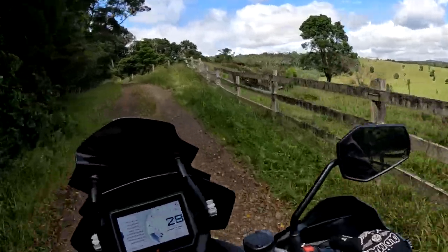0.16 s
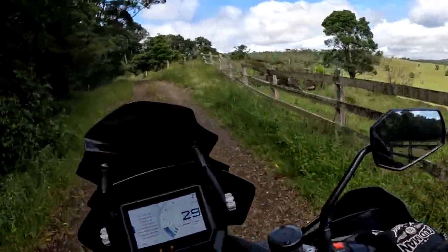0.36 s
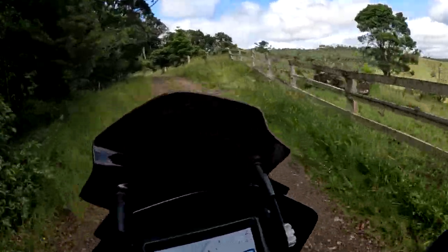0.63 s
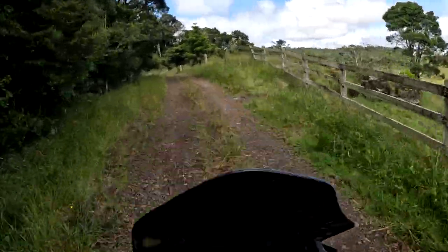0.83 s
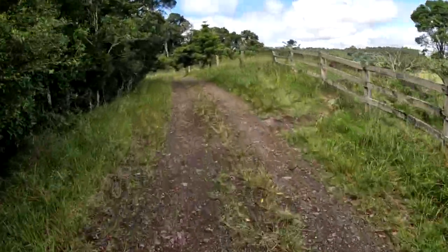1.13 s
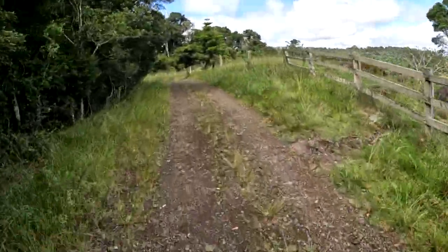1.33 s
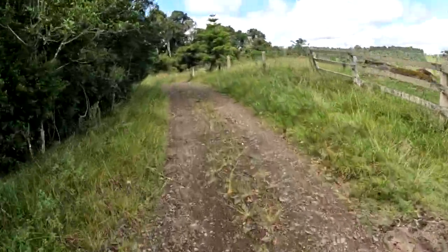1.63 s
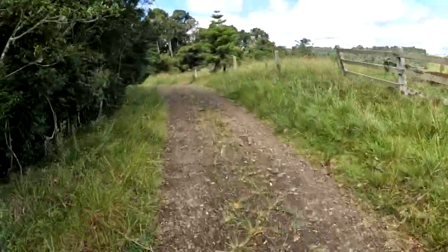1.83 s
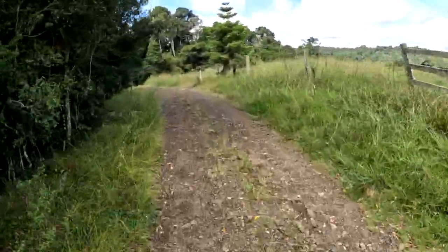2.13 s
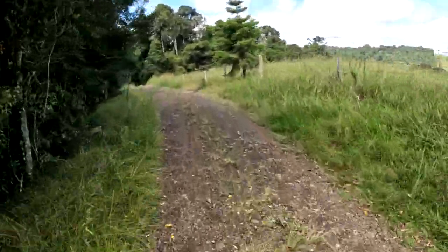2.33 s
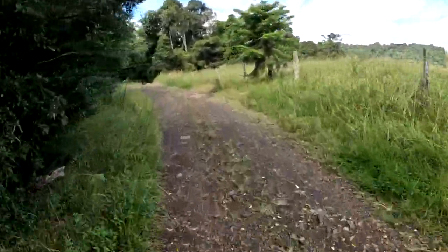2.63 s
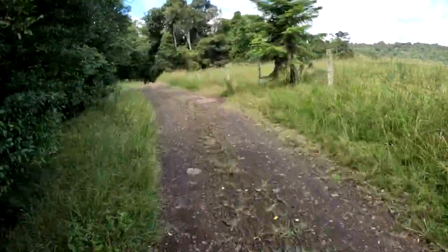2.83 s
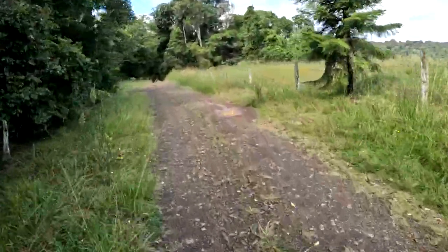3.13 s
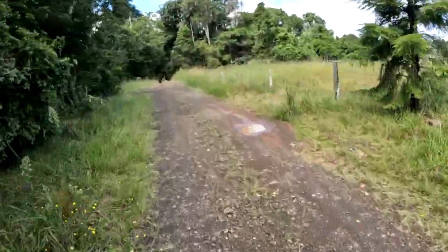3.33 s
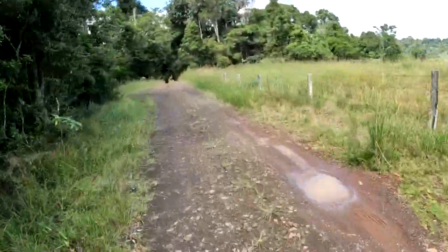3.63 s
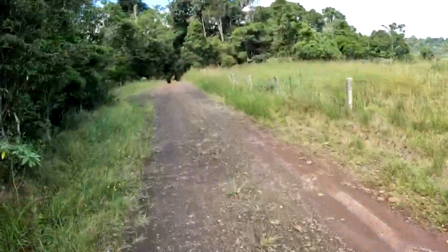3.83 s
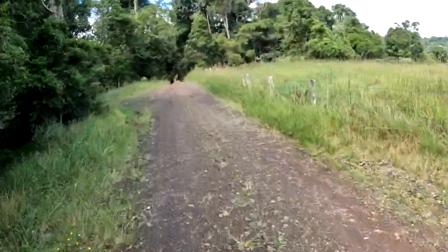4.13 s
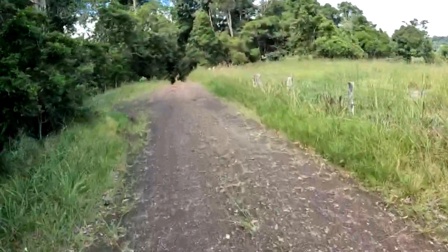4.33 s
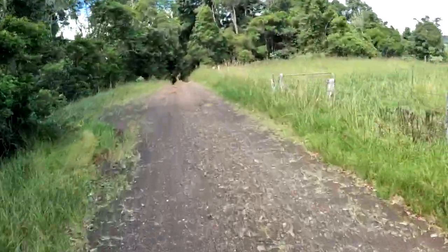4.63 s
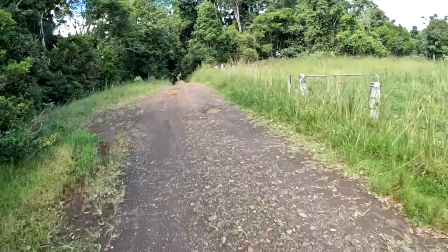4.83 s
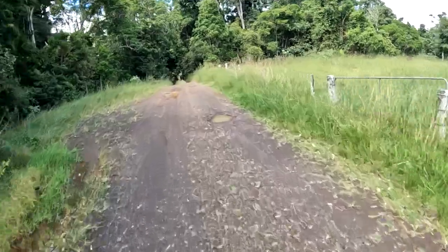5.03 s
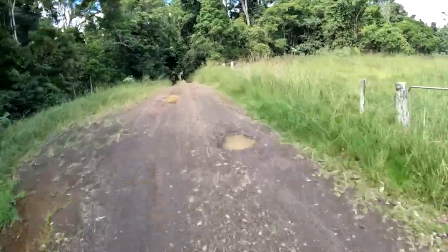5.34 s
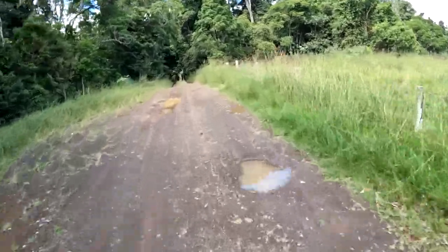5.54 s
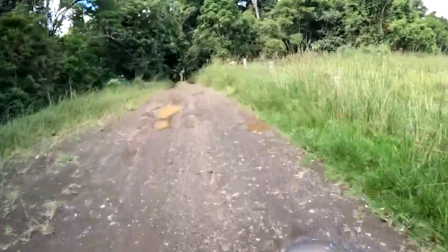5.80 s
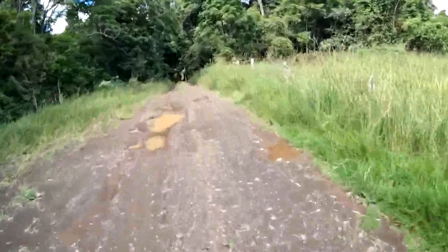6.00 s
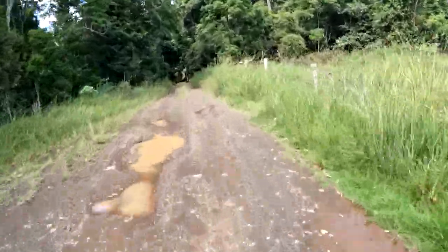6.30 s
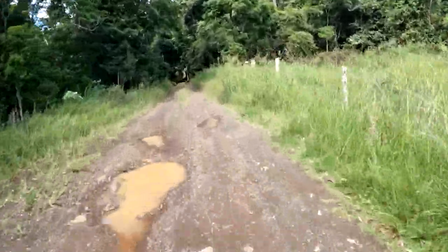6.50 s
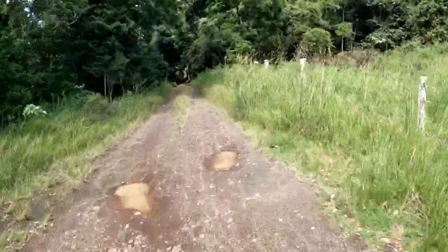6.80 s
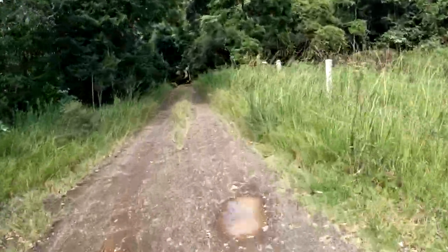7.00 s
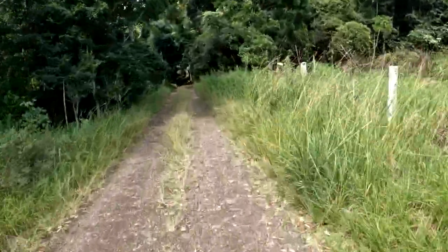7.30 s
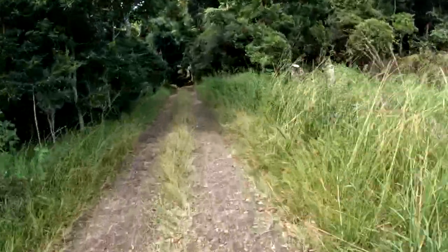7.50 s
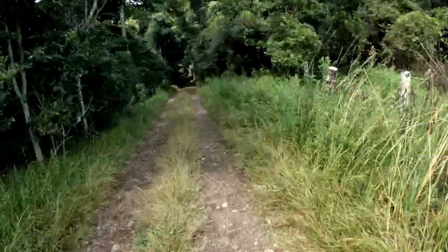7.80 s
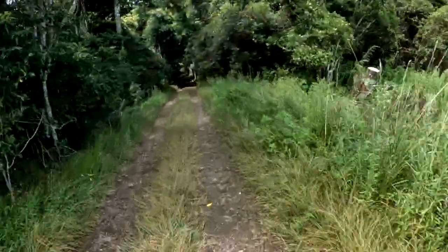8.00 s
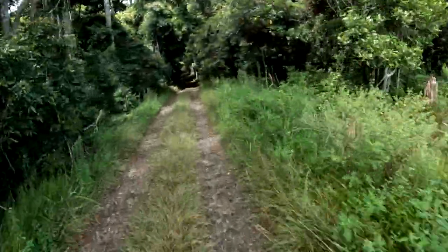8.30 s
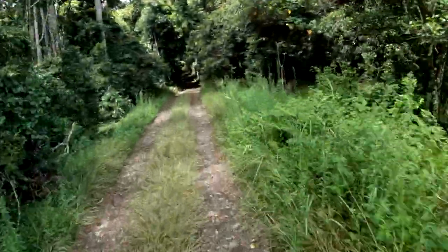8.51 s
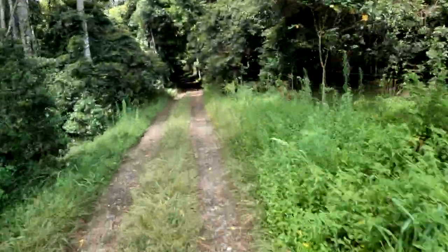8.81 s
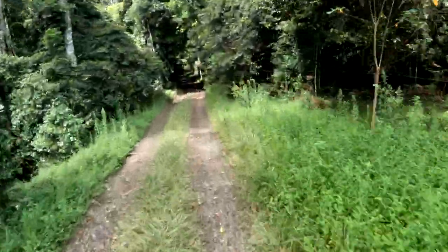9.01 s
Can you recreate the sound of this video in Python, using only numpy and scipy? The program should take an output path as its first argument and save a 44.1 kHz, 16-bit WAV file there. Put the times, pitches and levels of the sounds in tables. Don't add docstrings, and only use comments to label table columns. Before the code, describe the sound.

A low, lumpy motorcycle engine drives along an open rural gravel track. Wind thuds softly at the onboard microphone, dull and centred at first. Revs rise, the throttle closes and the note softens and falls, then drops sharply with a higher gear before a slow lugging pull. Gravel crunches throughout, with stones striking the belly plate, becoming clearer, wider and busiest in a stony rut near the end.

```python
import sys
import numpy as np
from scipy import signal
from scipy.io import wavfile
from scipy.ndimage import uniform_filter1d

SR = 44100
rng = np.random.default_rng(int(sys.argv[2]) if len(sys.argv) > 2 else 0)


def voltage_ratio(level):
    return 10 ** (np.asarray(level, float) / 20)


def dump(signal):
    limited = np.clip(np.atleast_2d(signal).T, -1, 1)
    pcm = np.round(limited * 32767).astype(np.int16)
    wavfile.write(sys.argv[1], SR, pcm)


N = 403515
T = np.arange(N) / SR
UPSHIFT_S = 6.22
LOW_GEAR, HIGH_GEAR = T < UPSHIFT_S, T >= UPSHIFT_S
V_GAP_CYCLES = 285 / 720
INTAKE_AT_CYCLES = .79


def curves(table):
    s, *columns = np.transpose(table)
    return [np.interp(T, s, c) for c in columns]


def unit(x):
    return x / np.sqrt(np.mean(x ** 2))


def band(x, hz, width_hz):
    return signal.lfilter(*signal.iirpeak(hz, hz / width_hz, SR), x)


def ring(pulses, modes):
    return sum(voltage_ratio(db) * band(band(pulses, hz, w), hz, 1.3 * w) for hz, w, db in modes)


def steep(x, hz, kind):
    return signal.sosfilt(signal.butter(6, hz, kind, fs=SR, output="sos"), x)


def below(x, hz, order=5):
    return signal.sosfiltfilt(signal.butter(order, hz, fs=SR, output="sos"), x)


def walk(rate_hz):
    k = int(SR / rate_hz)
    steps = np.repeat(rng.standard_normal(N // k + 1), k)
    return 1.8 * uniform_filter1d(uniform_filter1d(steps, k), k)[:N]


def ports(lean, side_db):
    mid, side = rng.standard_normal((2, N))
    return mid + (lean * mid + voltage_ratio(side_db) * side) * np.array([[1], [-1]])


# (time [s], stereo share [0-1])
OPENING = [(0, 0.05), (4.15, 0.06), (4.75, 0.36), (5.3, 0.68), (6.5, 0.77), (8, 0.83), (9.15, 1)]


def stereo_share():
    return curves(OPENING)[0]


# (time [s], level [dB])
GUSTS = [(0, -40), (0.25, -25), (0.55, -29.5), (0.8, -34), (1.4, -33), (2.7, -30.5), (3.9, -32), (4.5, -40),
         (5.3, -46), (6.57, -40.5), (7.4, -43), (8.2, -35), (9.15, -46)]


def wind():
    buffet = unit(band(band(ports(.02, -14.5), 23, 54), 27, 74))
    return voltage_ratio(curves(GUSTS)[0] + 9.5 + 1.5 * walk(6.4)) * buffet


# (time [s], level [dB])
PORT_HISS = [(0, -84.5), (1.65, -82.5), (1.7, -67), (2.55, -64), (3.4, -59), (3.9, -65), (6.5, -75.5),
             (7.7, -71.5), (9.15, -67.5)]


def port_hiss(heap_db):
    noise = ports(0.3, -4.5)
    broad = voltage_ratio(-16 + 12 * stereo_share()) * band(noise, 12800, 3600)
    hiss = band(band(noise, 12100, 900), 12100, 1500) + broad
    level_db = curves(PORT_HISS)[0] + 0.9 * heap_db + 1.8 * walk(60)
    return voltage_ratio(level_db) * unit(hiss - (T < 4.5) * below(hiss, 11300))


def bright_tick():
    t = np.maximum(T - 9.146, 0)
    return voltage_ratio(-35) * (t > 0) * np.exp(-t / .004) * steep(ports(.2, -2.5), 9500, "high")


# (time [s], peak [dB])
GRIT = [(0.3855, -58), (0.6255, -54), (0.7402, -50), (0.9552, -55.5), (1.2471, -55.5), (1.4632, -51.5),
        (3.2926, -54.5), (3.4575, -54.5), (3.6255, -59), (3.683, -50.5), (3.7374, -56), (3.9478, -52),
        (4.0951, -55), (4.2527, -58), (4.4408, -55), (4.4705, -50.5), (4.4965, -47), (5.2772, -51),
        (5.4804, -46.5), (5.5438, -44.5), (5.6221, -52), (5.6416, -48), (5.684, -48), (5.7259, -46.5),
        (5.8082, -41.5), (5.8671, -42), (5.9574, -49), (6.1614, -49.5), (6.4193, -49.5), (6.7116, -45.5),
        (6.759, -48.5), (6.987, -47), (7.0653, -47), (7.3502, -44.5), (7.559, -47), (7.7835, -37),
        (7.8201, -42.5), (7.8461, -40), (7.8986, -42), (7.9194, -38.5), (7.9628, -37.5), (8.2432, -43),
        (8.3308, -40.5), (8.4266, -40.5), (8.763, -44), (8.8474, -37.5), (8.9426, -42.5), (8.9825, -45.5),
        (9.0349, -40), (9.102, -38.5)]


def grit_ticks(t60_s=0.02):
    envelope, t = np.zeros(N + 2000), np.arange(2000) / SR
    for s, db in GRIT:
        envelope[int(s * SR):][:2000] += voltage_ratio(db - 6.5) * np.exp(-np.log(1000) * t / t60_s)
    return envelope[:N] * unit(band(band(ports(.2, -4.0), 8800, 3500), 8800, 5000))


# (time [s], gravel level [dB])
SURFACE = [(0, -46), (0.36, -43), (2.5, -42), (3.7, -41), (3.95, -44), (4.87, -48.5), (6.85, -47.5),
           (7.18, -41.5), (7.74, -42.5), (8.5, -42.5), (9.15, -42.5)]


def surface():
    return curves(SURFACE)[0]


# (time [s], rise [dB], length [s])
HEAPS = [(0.672, 0, 0.5), (0.986, 6.5, 0.066), (1.54, 6, 0.18), (1.692, 3, 0.06), (3.69, 2, 0.24),
         (5.507, 3, 0.072), (6.198, 6, 0.04), (6.453, 4.5, 0.063), (7.98, 3, 0.37), (8.952, 1.5, 0.059),
         (9.129, -0.5, 0.054)]


def heaps():
    return sum(db * np.maximum(1 - np.abs(T - s) * 2 / length_s, 0) for s, db, length_s in HEAPS)


def body(modes, lean, side_db, flicker_db):
    out = 0
    for hz, w, db in modes:
        noise = band(band(ports(lean, side_db), hz, w), hz, 1.56 * w)
        out = out + voltage_ratio(db + flicker_db * walk(25)) * noise / w ** .5
    return unit(out)


# (frequency [Hz], width [Hz], level [dB])
TYRE_MODES = [(1080, 470, 2), (1387, 200, -4), (1798, 590, 1.5)]


def tyre_roar(looser_db, heap_db):
    roar_db = -34.5 + 0.51 * looser_db + heap_db
    return voltage_ratio(roar_db) * below(body(TYRE_MODES, 0.18, -11.5, 1.0), 2010, order=8)


# (frequency [Hz], width [Hz], level [dB])
CASING_MODES = [(150, 200, 2), (376.4, 140, -1.5), (482.5, 150, -0.5), (607, 200, -21.5)]


def casing_noise(bark_db, looser_db, heap_db):
    casing_db = -25 + 0.13 * (bark_db - PULLING_BARK_DB) + 0.53 * looser_db + 0.74 * heap_db
    return voltage_ratio(casing_db - 2.5) * body(CASING_MODES, 0.18, -20.5, 1.4)


# (frequency [Hz], density [dB per Hz])
GRAVEL_SPECTRUM = [(1290, -30), (2200, 3.5), (2520, -7.5), (2940, -3.5), (3770, -10.5), (5070, -12.5),
                   (7490, -20.5), (11000, -35), (14300, -59), (22000, -120)]


def gravel():
    grains = (rng.random(N) < 900 / SR) * voltage_ratio(np.minimum(4.0 * rng.exponential(1, N), 14))
    gate = unit(signal.lfilter([1], [1, -.97], grains))
    surge, out = walk(24), 0
    hz_points, db_points = np.transpose(GRAVEL_SPECTRUM)
    for hz in 2300 * 2 ** np.arange(0, 2.4, 1 / 3):
        db = np.interp(np.log(hz), np.log(hz_points), db_points) + 10 * np.log10(hz)
        db = db + 0.19 * surge + 0.34 * walk(30)
        noise = ports(0.3, -11 + hz / 2500) * (1 + 0.25 * gate)
        out = out + voltage_ratio(db) * band(band(noise, hz, hz / 1.2), hz, hz / 3.7)
    return unit(out)


# (frequency [Hz], width [Hz], level [dB])
PLATE_MODES = [(946, 74, 3), (1130, 280, 2.5), (3100, 300, -19.5)]


def chips():
    hits = (rng.random(N) < 140 / SR) * rng.standard_normal(N)
    hits = hits * voltage_ratio(np.minimum(3.0 * rng.exponential(1, N), 12))
    return unit(ring(hits, PLATE_MODES)) * np.array([[1.2], [.8]])


# (time [s], peak [dB], ring [Hz])
PLATE_HITS = [(0.526, -28.5, 1270), (0.67, -32, 904), (0.749, -23.5, 1160), (0.866, -27, 970),
              (0.971, -31, 1050), (1.03, -33, 1030), (1.087, -28, 1360), (1.261, -22, 1016),
              (1.489, -28, 950), (1.851, -27, 1340), (1.936, -33, 1010), (2.535, -34, 1040),
              (2.882, -31, 1030), (3.457, -23, 845), (3.568, -28, 1340), (3.684, -22.5, 1310),
              (3.736, -25, 1080), (3.799, -22, 1207), (4.094, -28, 920), (4.1, -23, 1170),
              (4.528, -30, 950), (4.638, -26.5, 1190), (5.165, -28, 940), (5.276, -23.5, 940),
              (5.48, -27, 1390), (5.544, -22, 1080), (5.863, -23, 1140), (5.96, -25, 1060),
              (6.164, -28, 1450), (6.217, -21, 1130), (6.255, -35, 1090), (6.319, -29, 1200),
              (6.706, -29, 1130), (6.935, -24, 1110), (7.028, -31, 1410), (7.121, -20, 1150),
              (7.177, -30, 1040), (7.217, -34, 1020), (7.268, -21, 1080), (7.357, -27, 1150),
              (7.416, -25, 1056), (7.703, -21, 1080), (7.732, -30, 1470), (7.751, -35, 1150),
              (7.899, -24, 1080), (7.96, -23, 1190), (7.998, -25, 1080), (8.105, -32, 1090),
              (8.275, -24, 1210), (8.331, -24, 920), (8.38, -20, 920), (8.407, -26, 1180),
              (8.737, -31, 915), (8.84, -18, 1150), (8.891, -24, 1040), (8.913, -18, 1010),
              (8.985, -20, 1130), (9.038, -23, 1130), (9.071, -23, 1240), (9.106, -22.5, 925)]


def pings(t60_s=0.043):
    out, t = np.zeros(N + 4000), np.arange(4000) / SR
    fade = np.exp(-np.log(1000) * t / t60_s) * (1 - np.exp(-t / 0.0014))
    for s, db, hz in PLATE_HITS:
        grit = rng.standard_normal(4000)
        rattle = 0.55 * unit(band(grit, hz, 500)) + 0.09 * unit(band(grit, 2.1 * hz, 500)) + 0.22 * grit
        hit = voltage_ratio(db - 1.2) * (1.3 * np.sin(2 * np.pi * hz * t) + rattle) * fade
        out[int((s - .001) * SR):][:4000] += hit
    return steep(out[:N], 5100, "low") * np.array([[1.15], [.85]])


# (time [s], peak [dB], top edge re peak [dB])
CRACKS = [(0.4803, -26, -23), (0.632, -31, -12), (0.742, -26, -15.5), (0.5744, -29.5, -24),
          (0.6847, -35, -17), (0.775, -25, -16.5), (0.862, -30, -16), (0.9454, -27, -18),
          (0.9715, -21, -18), (1.0779, -33, -22), (1.099, -25.5, -20.5), (1.1674, -36, -28),
          (1.4473, -23.5, -17), (1.5367, -19.5, -23), (1.7384, -38, -19), (2.1047, -34.5, -16.5),
          (2.158, -32.5, -27.5), (2.2423, -32, -20), (2.6816, -25, -25), (2.8878, -36, -25),
          (2.912, -26, -24), (3.2126, -30.5, -28), (3.434, -28, -23), (3.457, -24, -24),
          (3.5667, -29.5, -17), (3.6254, -32.5, -19), (3.7444, -32.5, -20), (3.8156, -32, -21),
          (5.277, -31.5, -6), (5.48, -25.5, -16), (5.516, -28, -12.5), (5.5433, -32.5, -14),
          (5.8356, -25, -13), (5.8642, -26.5, -11.5), (6.1637, -25.5, -15), (6.1892, -26.5, -14.5),
          (6.2054, -21, -24), (6.408, -29.5, -13), (6.7155, -25.5, -6), (6.9305, -33, -20),
          (6.9645, -26, -14.5), (6.981, -24.5, -21), (7.0289, -33.5, -19), (7.063, -18, -26.5),
          (7.1747, -32, -14), (7.267, -24, -16),
          (7.761, -24.5, -18.5), (7.7843, -22.5, -16.5), (7.847, -24.5, -15), (7.899, -21, -11),
       (7.9198, -14, -29), (7.939, -23, -9), (7.9583, -18, -24), (7.972, -25, -14), (7.988, -19.5, -17),
       (8.011, -22, -13.5), (8.025, -25, -21.5), (8.0468, -23.5, -17.5), (8.0644, -38, -16.5),
       (8.273, -21, -22.5), (8.3294, -24.5, -8), (8.3803, -32.5, -20), (8.426, -23.5, -12),
       (8.47, -22.5, -24.5), (8.5554, -29.5, -18.5), (8.6642, -36.5, -17.5), (8.7221, -33.5, -12),
       (8.777, -24, -20), (8.84, -23.5, -14.5), (8.8537, -29.5, -19), (8.881, -21, -23.5),
       (8.914, -30.5, -12.5), (8.9427, -25.5, -13.5), (8.9594, -28, -18.5), (8.9842, -30.5, -16.5),
       (9.0358, -18.5, -15), (9.045, -27.5, -15), (9.07, -24.5, -16), (9.105, -19, -20),
       (9.1236, -26.5, -5)]


def cracks(t60_s=0.066):
    low, high = np.zeros((2, N + 4000))
    t = np.arange(4000) / SR
    tail = np.exp(-np.log(1000) * t / t60_s) * (1 - np.exp(-t / 0.0014))
    for s, db, top_db in CRACKS:
        low[int(s * SR):][:4000] += voltage_ratio(db - 7.5) * tail
        high[int(s * SR):][:4000] += voltage_ratio(db + top_db - 6.0) * tail
    crumbs = voltage_ratio(2.1 * walk(250))
    low_noise = unit(steep(band(ports(.12, -8.0), 1700, 1900), 7700, "low"))
    high_noise = unit(steep(band(ports(.12, -5.0), 6500, 4000), 9800, "low"))
    return crumbs * (low[:N] * low_noise + high[:N] * high_noise)


# (teeth per cycle [1], level [dB], gain in higher gear [dB])
GEAR_TEETH = [(79.5, -45, -6.5), (60.8, -48, -10), (121.6, -64, -14), (162, -58.5, 1)]


def whine(cycle, hz, braking):
    slack, out = .11 * walk(70), 0
    fade_db = 3 * np.maximum(hz - 24.6, 0) + 7 * np.maximum(21.6 - hz, 0) * (T < 1) + 3.6 * braking
    for teeth, db, gear_db in GEAR_TEETH:
        level_db = db + 1.5 + gear_db * HIGH_GEAR - fade_db + 3.5 * walk(35)
        out = out + voltage_ratio(level_db) * np.sin(teeth * 2 * np.pi * cycle + 13 * slack * (1 + teeth / 80))
    return out


# (order [per cycle], level [dB], slope over 17 cycles/s [dB per Hz])
SLACK_ORDERS = [(10, -45, -1.2), (11, -41, 0.6), (12, -48, 3.5), (13, -43, 5.5), (15, -30, 0.3),
                (16, -42, -3.5), (17, -45, 0.2), (18, -40, -0.6)]


def chain(cycle, hz, shut, braking):
    hum = 0
    for k, db, rise_db in SLACK_ORDERS:
        level_db = db + rise_db * np.minimum(hz - 17, 2) + 1.4 * walk(9)
        hum = hum + voltage_ratio(level_db) * np.sin(k * 2 * np.pi * cycle + k + 0.23 * walk(5))
    dragged = -voltage_ratio(-37) * np.clip(23 - hz, 0, 1) * np.sin(10 * 2 * np.pi * cycle)
    return shut * np.sqrt(2) * (HIGH_GEAR * hum + braking * dragged)


# (order [per cycle], level at 26 cycles/s [dB], slope [dB per Hz], sign [+-1])
SINGING_ORDERS = [(9, -30, 7, -1), (11, -31, -3, 1), (12, -31, 0, -1)]


def singing(cycle, hz, shut):
    lines = 0
    for k, db, rise_db, sign in SINGING_ORDERS:
        lines = lines + sign * voltage_ratio(db + rise_db * (hz - 26) + walk(10)) * np.cos(2 * np.pi * k * cycle)
    return np.sqrt(2) * (1 - shut) * np.clip(hz - 23.3, 0, 1) * lines


PULLING_BARK_DB, SHUT_BARK_DB, IDLING_DB = -17.5, -23.5, -13
PULLING_KNEE_HZ, BRAKING_KNEE_HZ = 20.44, 23.74
EASE_S, EASE_LENGTH_S, EASE_DB = 2.9, 0.7, 4


def bark(hz, shut, braking):
    ease_db = EASE_DB * np.maximum(1 - np.abs(T - EASE_S) * 2 / EASE_LENGTH_S, 0)
    pulling = PULLING_BARK_DB - 0.5 * np.maximum(PULLING_KNEE_HZ - hz, 0) * HIGH_GEAR - ease_db
    coasting = SHUT_BARK_DB + IDLING_DB * (1 - braking) - braking * 3 * np.maximum(BRAKING_KNEE_HZ - hz, 0)
    return (1 - shut) * pulling + shut * coasting


def strokes(cycle, rear_lag, at, scatter_db, rear_db):
    out = np.zeros(N)
    for lag, db in ((0, 0), (V_GAP_CYCLES + rear_lag, rear_db)):
        hit = np.flatnonzero(np.diff(np.floor(cycle - at - lag)))
        out[hit] = voltage_ratio(db + scatter_db * rng.standard_normal(400)[:len(hit)])
    return out


def even(x):
    return x / np.sqrt(uniform_filter1d(x ** 2, SR // 6) + 1e-12)


# (frequency [Hz], width [Hz], level [dB])
OPEN_BOX = [(242.5, 34, 0.5), (268.2, 65.6, 11)]
# (frequency [Hz], width [Hz], level [dB])
TRUMPET_MODES = [(305.3, 38.7, 4.5), (325.8, 41, 2.3)]
# (frequency [Hz], width [Hz], level [dB])
SHUT_BOX = [(244.9, 30, 12.5), (270.5, 30.7, 10), (292.4, 26, -7.5)]


def airbox(cycle, hz, shut, bark_db):
    jitter = .003 + .008 * np.clip(1.3 - T, 0, 1)
    rear_lag = -.006 + 0.0071 * np.maximum(hz - 24.56, 0)
    intake_at = INTAKE_AT_CYCLES - .04 - 0.0089 * (hz - 17)
    pulling = strokes(cycle + jitter * walk(30), rear_lag, intake_at, 1.0, 0.26)
    duct = np.clip((hz - 17.4) / (21.96 - 17.4), 0, 1) * voltage_ratio(-2 + 0.074 * (hz - 29))
    soft = steep(pulling + duct * np.roll(pulling, int(0.00734 * SR)), 440, "low")
    late = strokes(cycle + .003 * walk(30), .029 - .012 * np.clip(22.8 - hz, 0, 1.2), .85, 1.2, -4.5)
    snorkel = voltage_ratio(-8.0 - 1.2 * (hz - 16.5)) * ring(soft, [(405, 150, -2.0)]) * HIGH_GEAR
    snorkel = snorkel + voltage_ratio(-9.5 + 2.1 * np.minimum(hz - 22.5, 0)) * ring(soft, [(404, 66, 0.5)]) * LOW_GEAR
    trumpets = voltage_ratio(1.5 * np.clip(hz - 23.5, -4, 1.5) * LOW_GEAR) * ring(soft, TRUMPET_MODES)
    barking = even(ring(soft, OPEN_BOX) + trumpets + snorkel)
    muffled = even(ring(np.where(LOW_GEAR, steep(late, 485, "low"), soft), SHUT_BOX))
    return voltage_ratio(bark_db - 0.57) * ((1 - shut) * barking + shut * muffled)


# (frequency [Hz], order level [dB])
PIPE_OPEN = [(36, -39.5), (43, -30.5), (48, -18), (55, -15.5), (64, -23.5), (86, -17.5), (124, -21.5),
             (136, -26.5)]
# (frequency [Hz], order level [dB])
PIPE_SHUT = [(33, -24.5), (42, -19.5), (54, -16.5), (64, -19.5), (78, -20.5), (93, -25.5), (110, -22),
             (132, -29.5)]


def leading_orders(hz, shut):
    def pipe(table, k):
        pipe_hz, db = np.transpose(table)
        return np.interp(np.log(k * hz), np.log(pipe_hz), db)

    levels = {}
    for k in (2, 3, 5):
        pulling = pipe(PIPE_OPEN, k) - 7 * (k == 3) + 9 * (k == 2) * HIGH_GEAR
        levels[k] = (1 - shut) * pulling + shut * pipe(PIPE_SHUT, k)
    return levels


def phase_leads(shut, braking, hz):
    second = (1 - braking) * (1.9 - .9 * shut - .28 * np.maximum(hz - 23, 0)) - .2 * braking
    return {2: second, 3: -.5 * braking - .2 * HIGH_GEAR, 4: -.35 - .6 * HIGH_GEAR, 5: 0}


# (order [per cycle], leading order [per cycle], level re leader [dB],
# loss over 17 cycles/s [dB per Hz], gain when shut [dB])
MINOR_ORDERS = [(4, 5, -14.5, -.85, 6), (6, 5, -6.5, 1.3, -7), (7, 5, -10, 0.1, -5), (8, 5, -13, 6, -3)]


def exhaust(cycle, hz, shut, braking):
    order_db = leading_orders(hz, shut)
    for k, leader, db, loss_db, shut_db in MINOR_ORDERS:
        order_db[k] = order_db[leader] + db - loss_db * (hz - 17) + shut_db * shut
    out, lead = 0, phase_leads(shut, braking, hz)
    for k, db in order_db.items():
        sign = np.sign(np.cos(np.pi * k * V_GAP_CYCLES))
        if k <= 5:
            turn = 2 * np.pi * k * (cycle - .11 - V_GAP_CYCLES / 2)
            wave = -np.cos(turn + lead[k] + .07 * walk(10))
        else:
            turn = 2 * np.pi * k * (cycle - INTAKE_AT_CYCLES - V_GAP_CYCLES / 2)
            wave = np.cos(turn - 1.08 * (k - 4.6) - .5 * (k == 6) + 0.2 * walk(14))
        out = out + sign * np.sqrt(2) * voltage_ratio(db + .8 * walk(12)) * wave
    return out


# (time [s], four-stroke cycle rate [Hz])
REVS = [(0.0, 19.74), (0.84, 21.21), (1.24, 22.91), (1.82, 23.06), (2.58, 25.98), (2.9, 25.46),
        (3.04, 26.49), (3.68, 27.16), (4.08, 24.39), (4.24, 24.51), (5.24, 23.05), (6.2, 20.68),
        (6.24, 16.81), (6.97, 15.9), (7.41, 17.25), (8.36, 19.07), (8.73, 18.02), (9.15, 18.84)]
# (time [s], throttle shut [0-1], engine braking [0-1])
COAST = [
    (0, 0, 0),
    (3.69, 0, 0),
    (3.72, 1, 1),
    (6.18, 1, 1),
    (6.26, 1, 0),
    (6.92, 1, 0),
    (7.2, 0, 0),
    (8.28, 0, 0),
    (8.4, 1, 0),
    (9.15, 1, 0),
]


def ride():
    hz, = curves(REVS)
    cycle = .04 + np.cumsum(hz) / SR + .009 * (T < 3.7) * walk(9)
    return hz, cycle, *curves(COAST)


def scene():
    hz, cycle, shut, braking = ride()
    bark_db, heap_db, loose_db = bark(hz, shut, braking), heaps(), surface()
    looser_db = loose_db - loose_db.max()
    crunch = voltage_ratio(0.41 * walk(45))
    road = casing_noise(bark_db, looser_db, heap_db) + crunch * tyre_roar(looser_db, heap_db)
    stones = voltage_ratio(loose_db + heap_db + 3.0) * crunch * gravel() + pings()
    stones = stones + voltage_ratio(loose_db - 2.5) * stereo_share() * chips()
    stones = steep(stones, 9480, "low") + cracks() + bright_tick()
    engine = exhaust(cycle, hz, shut, braking) + airbox(cycle, hz, shut, bark_db)
    middle = engine * np.array([[1.045], [.965]]) + wind() + whine(cycle, hz, braking)
    middle = middle + chain(cycle, hz, shut, braking) + singing(cycle, hz, shut)
    return middle + grit_ticks() + road + stones + port_hiss(heap_db)


def low_pass(x):
    return signal.sosfilt(signal.butter(12, 15130, fs=SR, output="sos"), x)


def record(dry):
    share = stereo_share()
    bass = below(dry, 960)
    dry = dry - bass + 0.85 * np.tanh(bass / 0.77)
    mono = dry.mean(axis=0)
    dull = 0.43 * below(mono, 4200) + .5 * below(mono, 7000, order=12) + 0.06 * below(mono, 12000)
    top = dry - below(dry, 11200)
    return low_pass((1 - share) * (dull + top) + share * dry)


dry = scene()
out = record(dry)
dump(out)
```